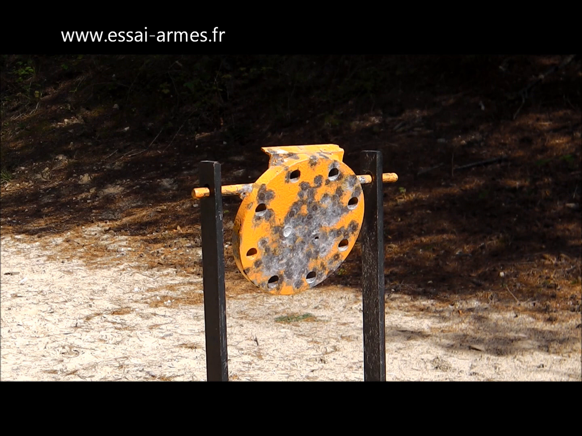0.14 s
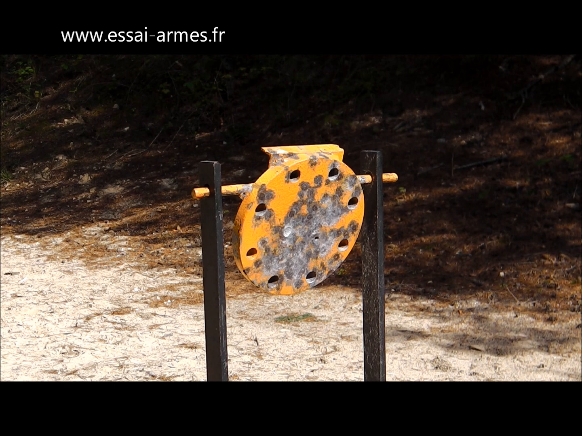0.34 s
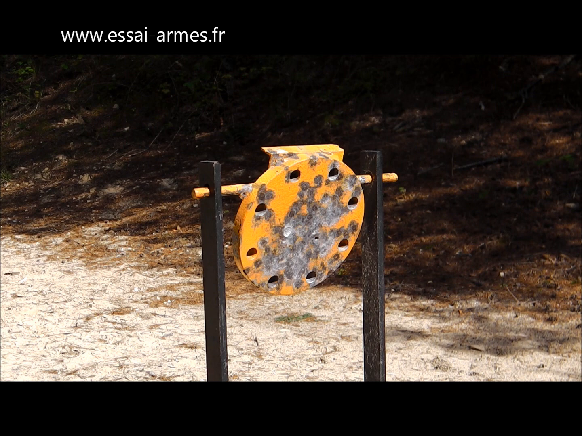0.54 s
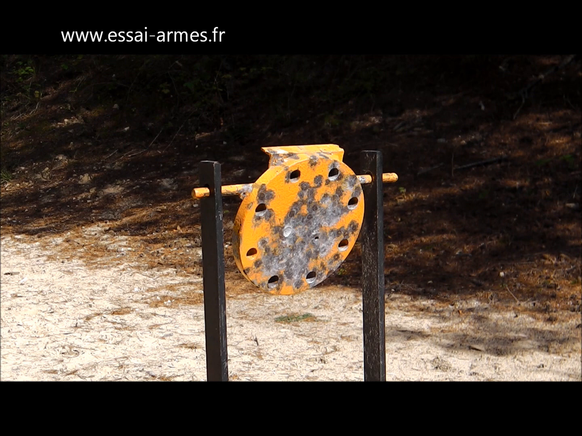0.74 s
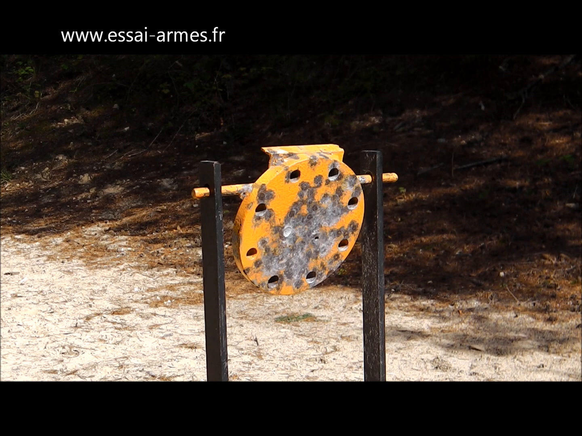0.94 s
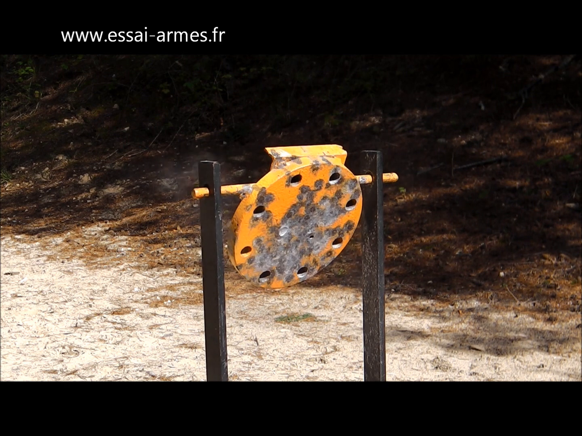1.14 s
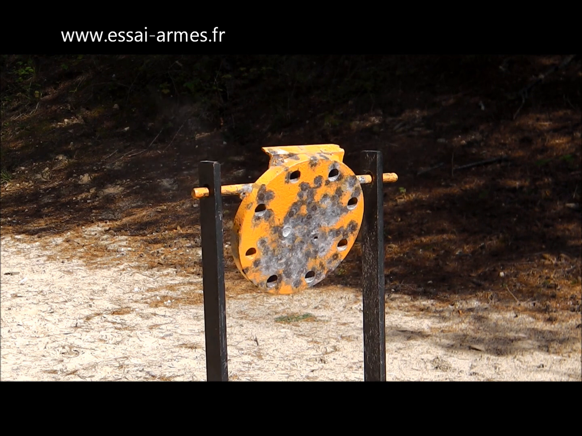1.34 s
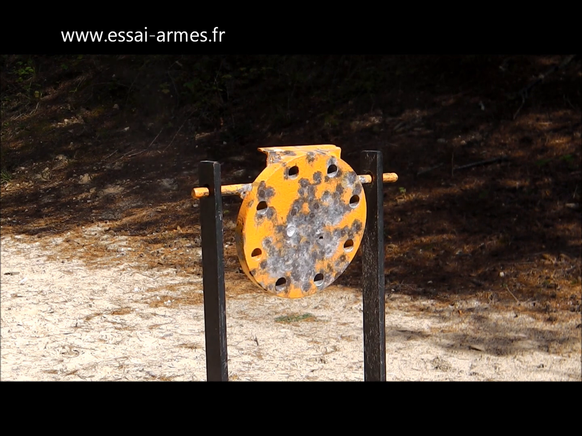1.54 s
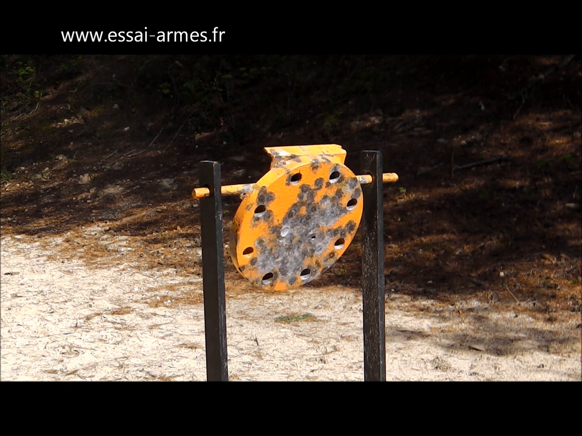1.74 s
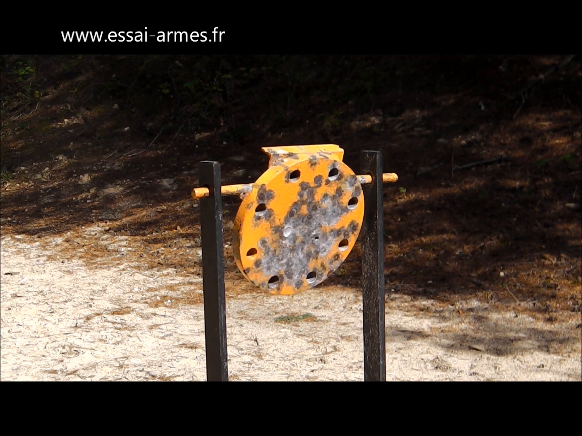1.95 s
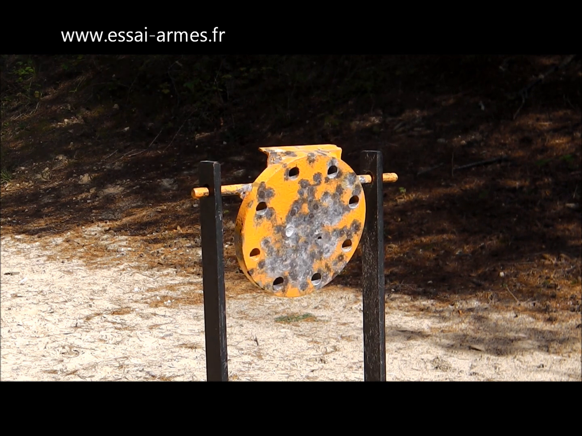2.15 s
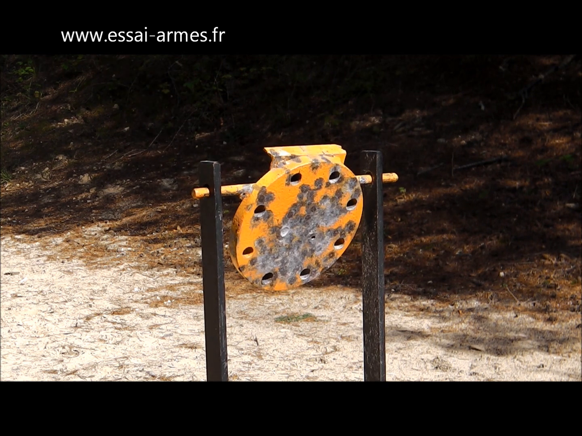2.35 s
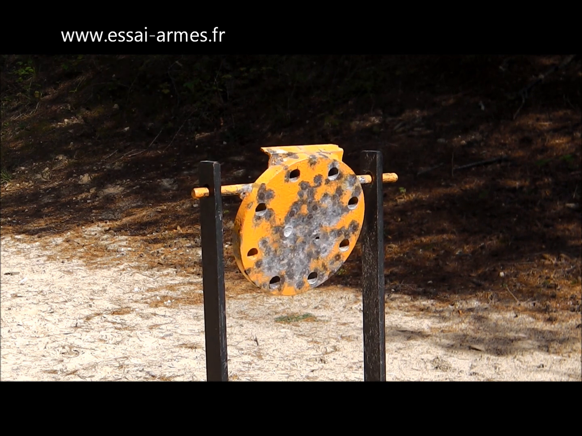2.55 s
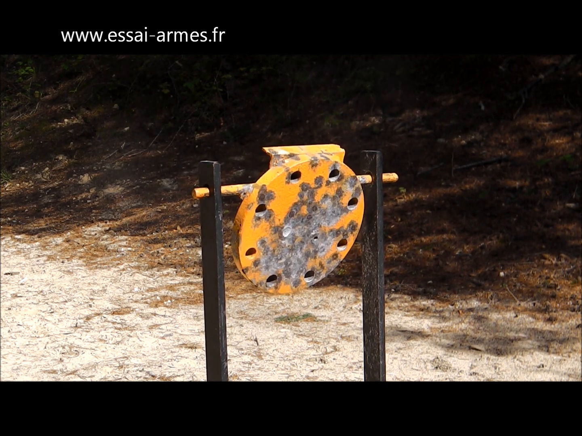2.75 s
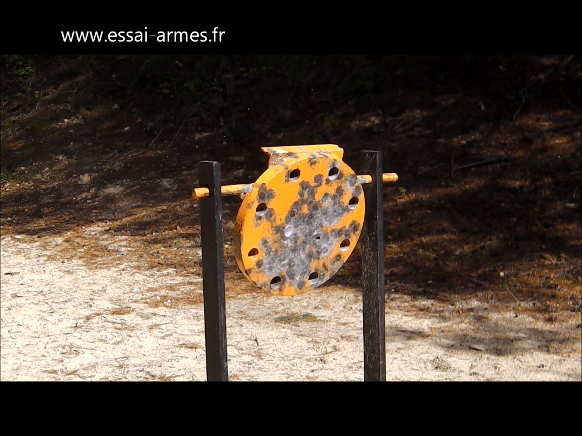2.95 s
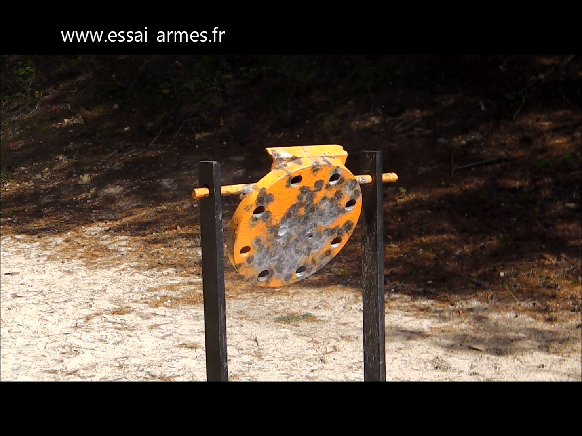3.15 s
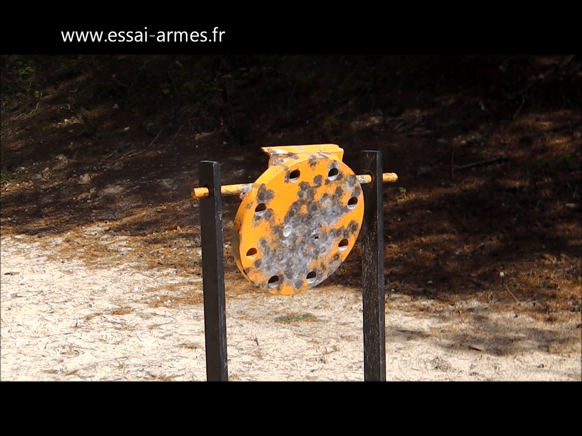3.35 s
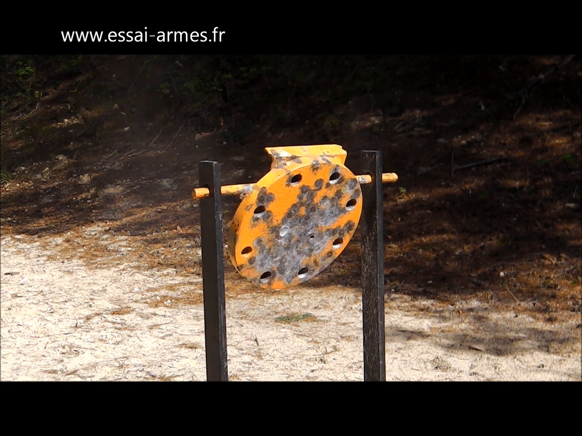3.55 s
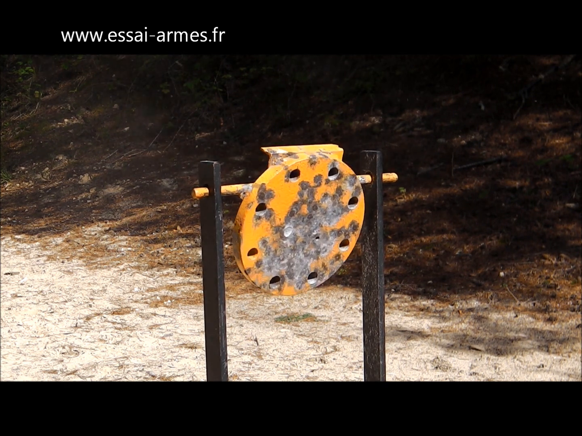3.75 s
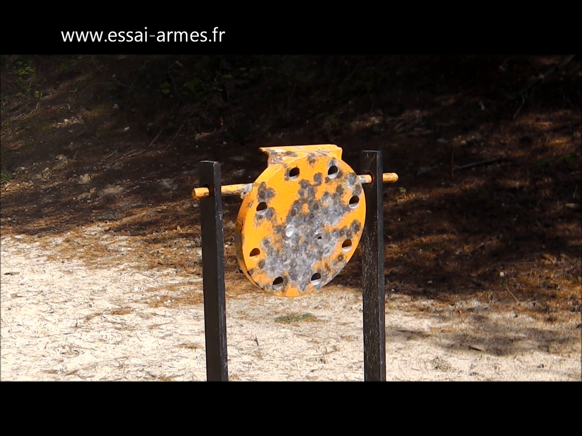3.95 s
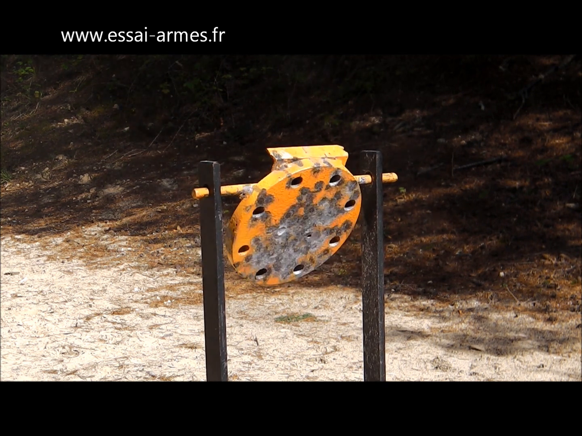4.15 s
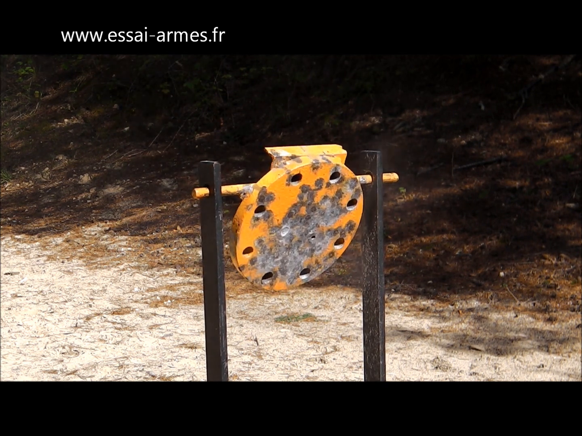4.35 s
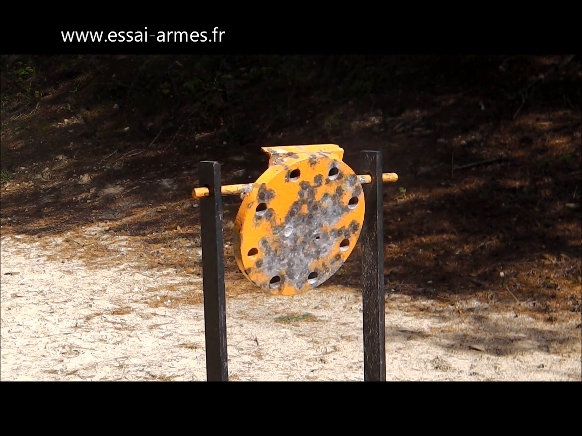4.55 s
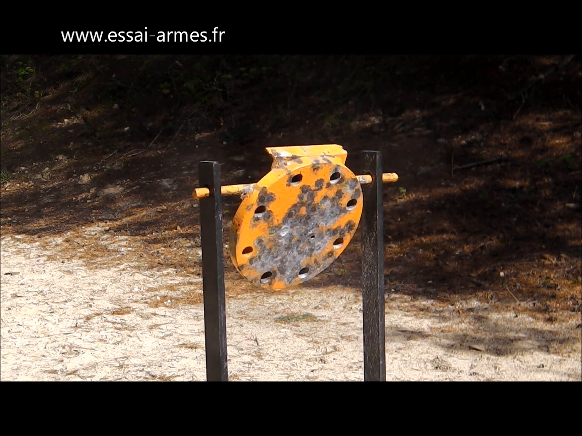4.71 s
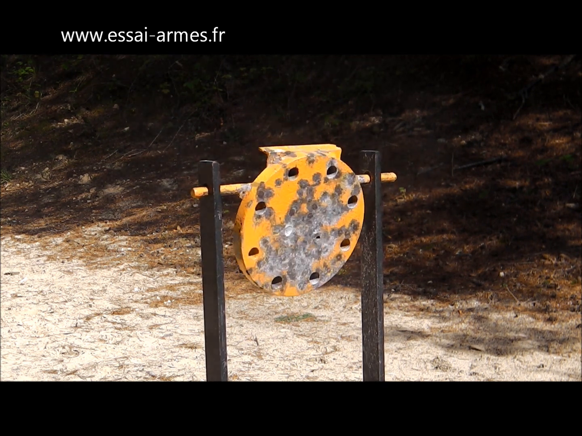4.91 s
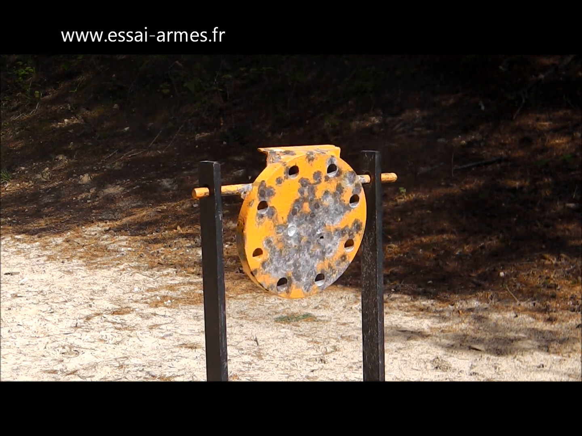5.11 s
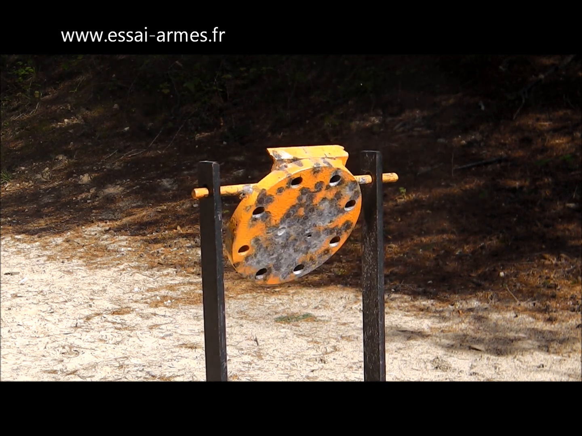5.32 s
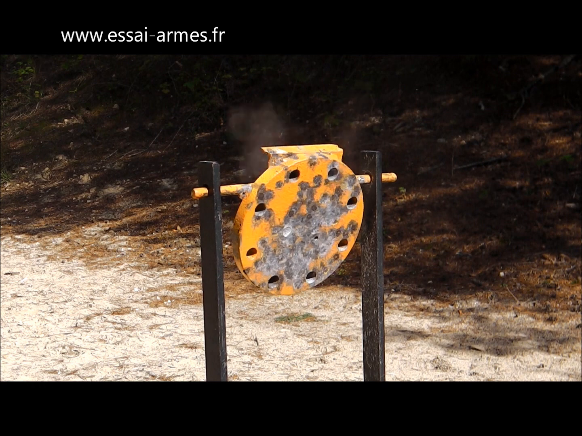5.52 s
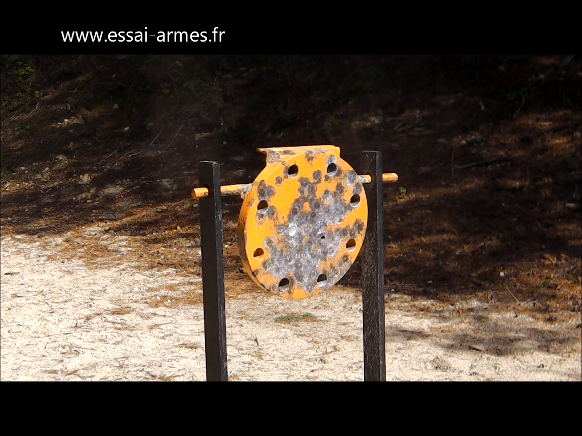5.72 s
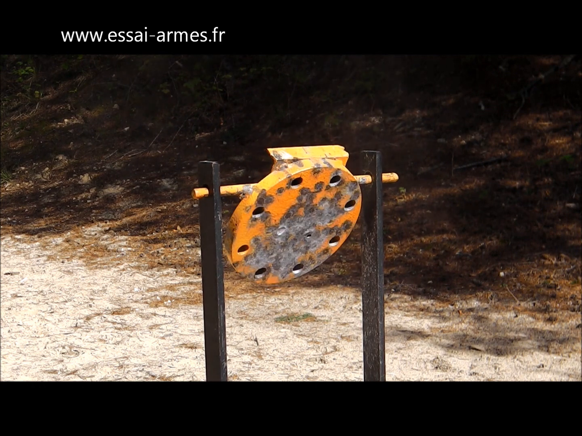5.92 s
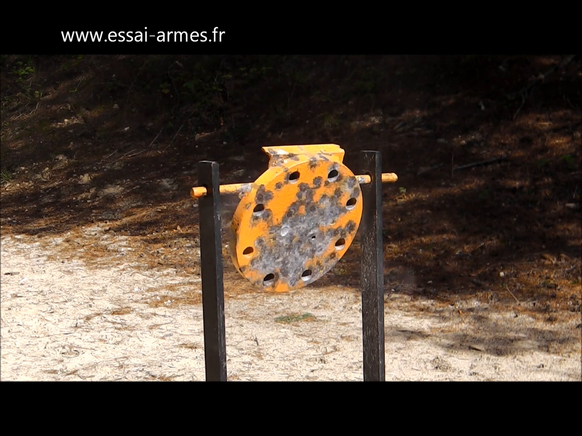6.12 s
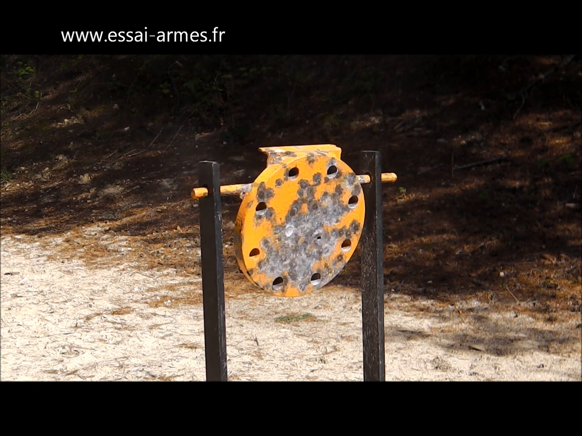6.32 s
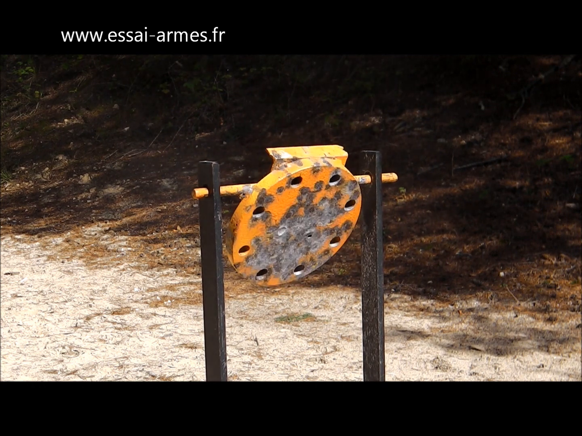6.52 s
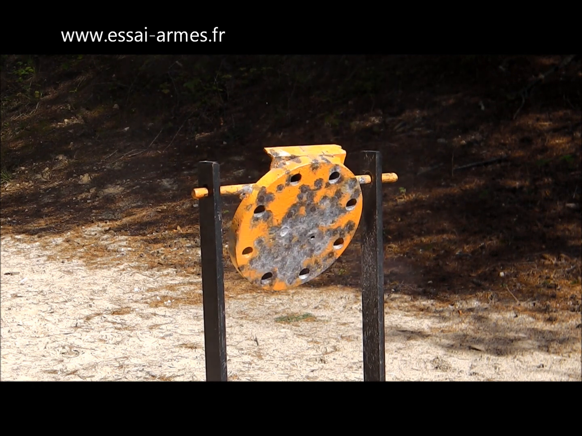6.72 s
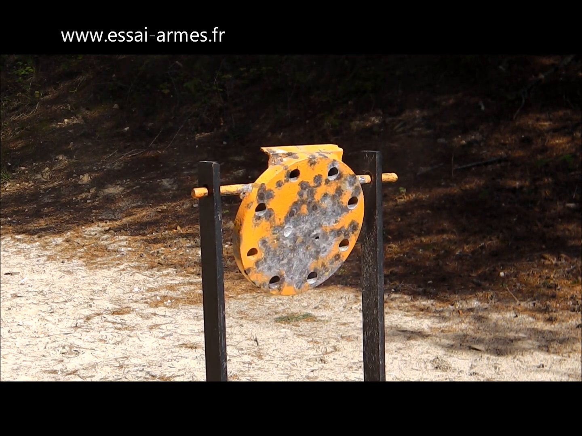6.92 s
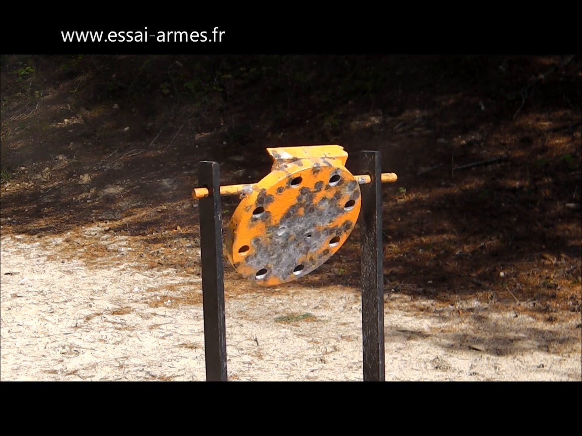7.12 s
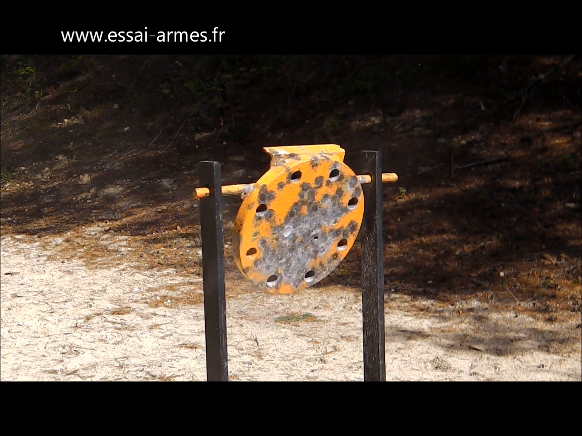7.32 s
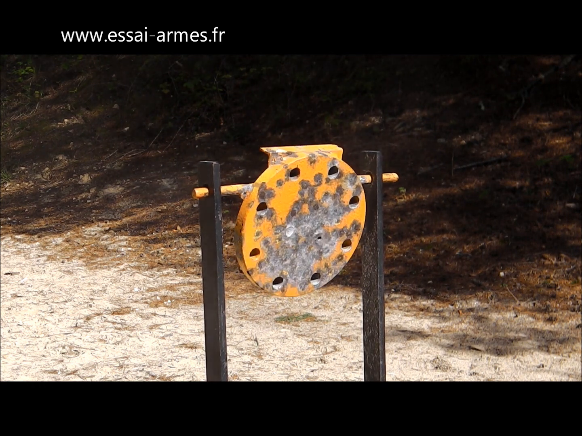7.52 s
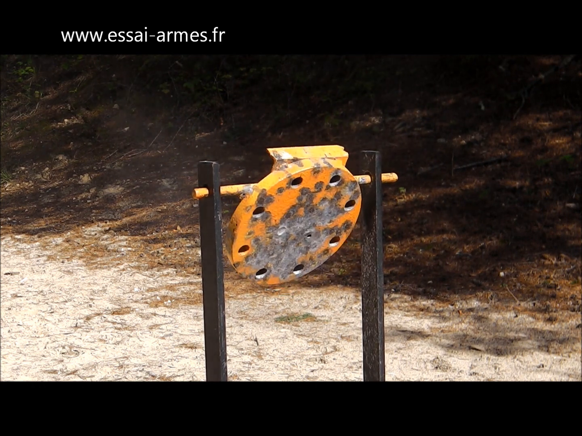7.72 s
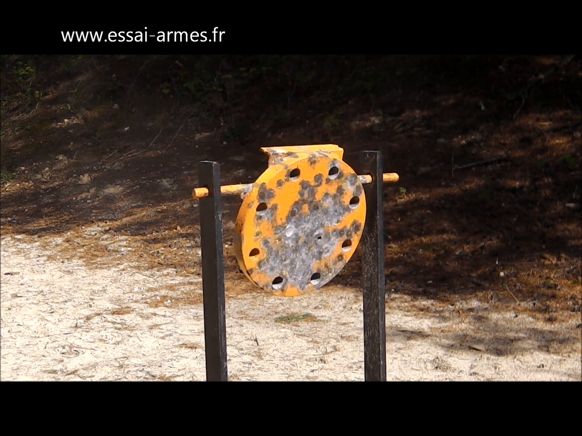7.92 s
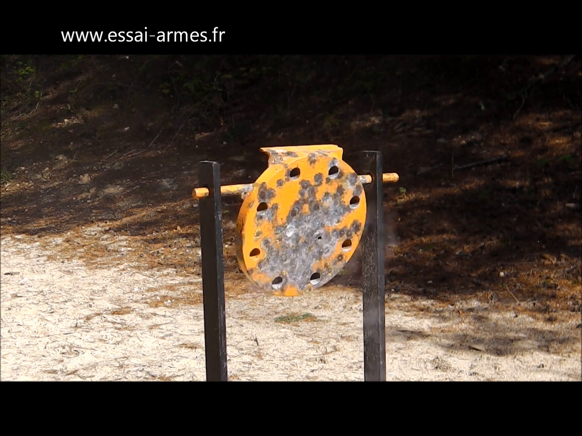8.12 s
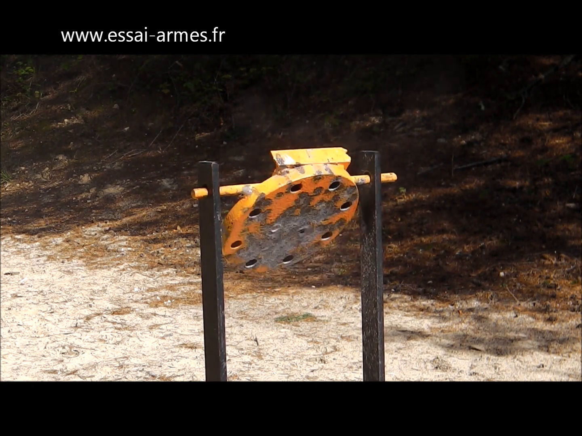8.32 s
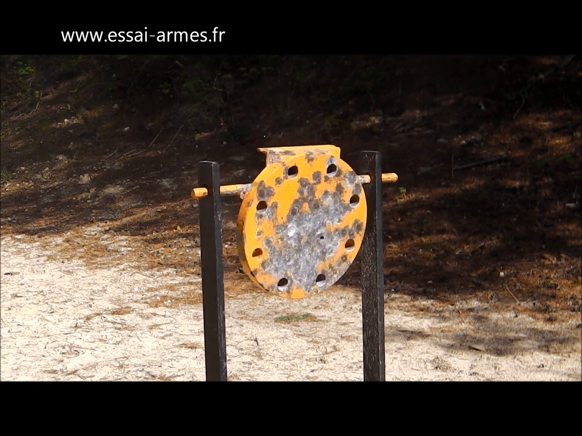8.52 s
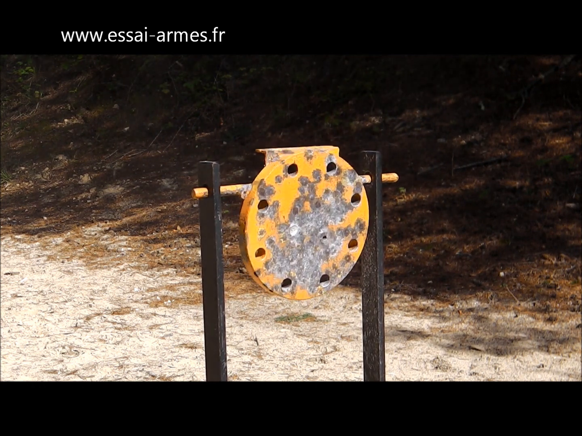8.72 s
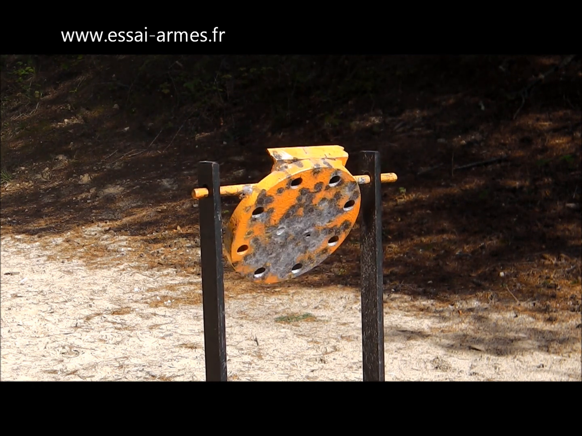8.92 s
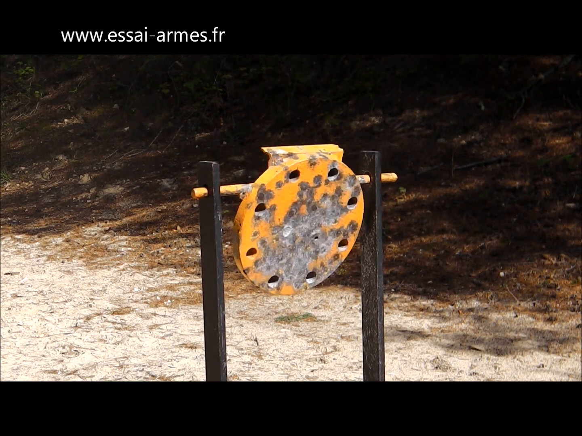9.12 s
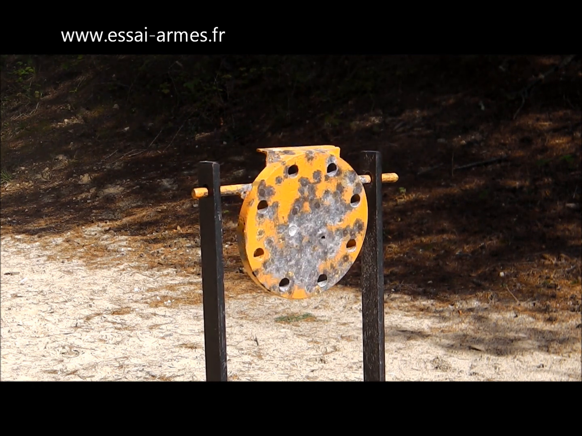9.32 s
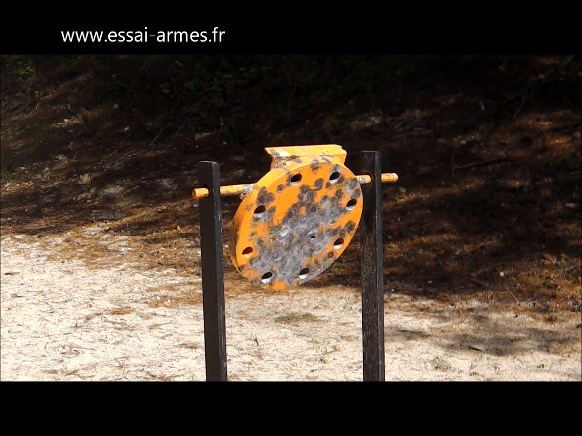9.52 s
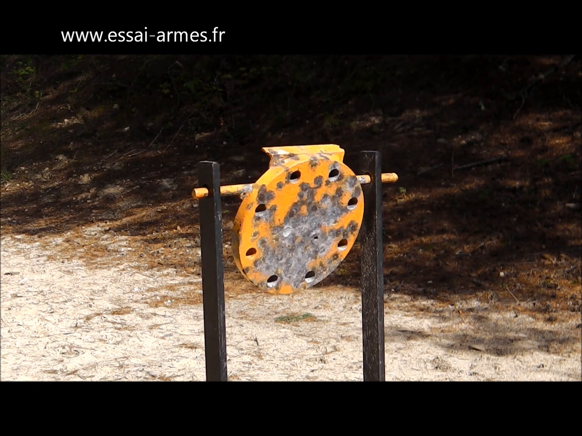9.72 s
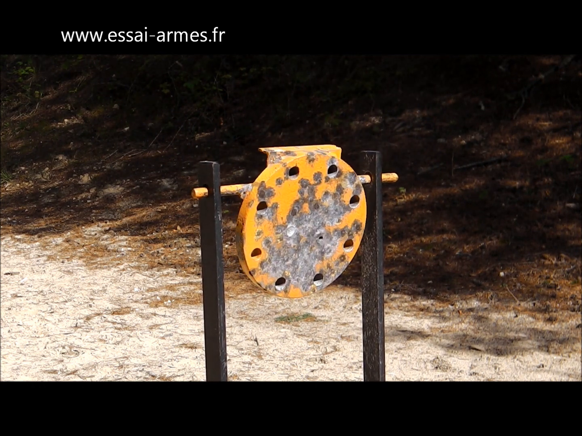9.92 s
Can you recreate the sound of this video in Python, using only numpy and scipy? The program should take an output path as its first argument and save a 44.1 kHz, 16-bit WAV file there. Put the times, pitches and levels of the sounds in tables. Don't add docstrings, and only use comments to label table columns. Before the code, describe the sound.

From 0 to 1.2 s there is only soft microphone hiss and a faint breeze in a quiet wood. At 1.2 s a small rifle starts firing, twenty-two shots until 8.3 s, spaced about 0.3 to 0.55 s apart. Each begins with a hard, dry, slightly overloaded crack and short low thump; about 9 ms later lead bursts on a hanging steel plate with a bright splat, fragments patter on the ground for a fraction of a second, and most hits add a short, high, quickly damped ping of varying strength. Scattered trunk echoes and a bank slap follow within 0.3 s, then a diffuse woodland wash rolls away. The camera's gain ducks and recovers around each shot. As the last tail fades, a bird gives a thin, very high whistle near 8.7 s and a louder one near 9.4 s, with a dry twig tick. Hiss and breeze remain until about 10 s.

```python
import sys
import numpy as np
from scipy import signal
from scipy.fft import rfft, irfft, next_fast_len
from scipy.io import wavfile
from scipy.ndimage import uniform_filter1d, map_coordinates

SR = 44100
rng = np.random.default_rng(int(sys.argv[2]) if len(sys.argv) > 2 else 0)


def amp(db):
    return 10 ** (np.asarray(db, float) / 20)


def wrap_up_sound(samples):
    columns = np.atleast_2d(samples).T
    tamed = np.clip(columns, -1, 1)
    steps = np.round(tamed * 32767).astype(np.int16)
    wavfile.write(sys.argv[1], SR, steps)


N = 439236

# start_s, boom_db, splash_db, spray_db, bank_echo_db
SHOTS = [(1.212, -23.5, -12.5, -28.9, -32), (1.6172, -30.5, -11, -21, -19.5), (1.969, -29.5, -13, -23, -23),
         (2.3977, -26, -12, -27, -27), (2.7351, -24, -10.5, -23, -25), (3.1756, -25, -11, -21, -30),
         (3.5559, -25.4, -8.5, -29.6, -24.5), (4.1181, -27, -9, -20.5, -28.5),
         (4.426, -24, -11.5, -26.5, -24.5), (4.7402, -24.5, -8, -28.5, -28), (5.031, -33, -5, -21.5, -32),
         (5.3459, -22, -9, -23.5, -30), (5.633, -24.5, -14.5, -27, -25.5),
         (5.9493, -23.1, -10, -22.5, -29.5), (6.2611, -22.5, -9.5, -21.5, -30),
         (6.5363, -23, -8.5, -24.5, -26), (6.8259, -26, -11, -24.5, -25.5), (7.1196, -29, -8, -22, -27.5),
         (7.4018, -25.5, -7.5, -59, -26.5), (7.6871, -30, -7.5, -21, -30),
         (7.9826, -24.5, -9.2, -25, -29.5), (8.279, -28.5, -8, -21.5, -40)]
# pitch_hz, level_db, t60_s, polarity
BOOM_MODES = [
    (73.3, 1, 0.061, 1),
    (394, 0, 0.055, -0.61),
    (130.6, 3.5, 0.11, 0.26),
]
# delay_s, level_db, colour_hz
TREES = [(.0065, -25, 2480), (.040, -14.5, 1150), (.045, -14, 1190), (.067, -13.5, 1520),
         (0.082, -42, 1630), (0.086, -14, 2310), (0.091, -23, 1590), (0.116, -33, 1700), (.130, -13, 1670),
         (.148, -18, 1490), (0.157, -24, 1460), (.162, -19.5, 1370), (0.17, -12.5, 2240), (.190, -27, 1700),
         (.197, -19, 1410), (0.201, -22, 1700), (.221, -17, 1300), (.241, -20, 1370), (.250, -32, 1390),
         (.268, -34, 1390)]
# freq_hz, density_db_per_hz
BANK_SPECTRUM = [(470, -19), (800, -34), (1780, 2.5), (3040, -1), (8360, -2.5), (11300, -10), (15800, -22)]
# freq_hz, density_db_per_hz
SPLASH_SPECTRUM = [(260, -43), (370, 3), (1290, -11.5), (3670, -2), (5200, -7), (8270, -2), (9140, -21),
                   (11200, 1), (15800, -19)]
# freq_hz, density_db_per_hz
SPRAY_SPECTRUM = [(180, -58), (300, -9), (510, -6), (735, -10), (1430, -5), (3320, -2), (3550, -11.5),
                  (3920, -3.5), (11200, -2.5), (15800, -14)]
# freq_hz, likeness
SPRAY_ALIKE = [(60, 0.48), (240, -0.2), (950, 0.51), (3770, 0.47), (15000, -0.17)]
# pitch_hz, t60_s, blur_hz, share_free_of_hanger (0-1)
PLATE_MODES = [(2128, .4, 3, .1), (3594, .3, 6, 0), (4110, .6, 6, .4), (4640, .7, 16, .2),
               (8330, .2, 30, 0), (11040, .2, 20, 0), (11600, .24, 10, 0), (12071, .22, 10, 0),
               (13487, .17, 12, 0)]
# nodal_diameters, half_waves_centre_to_rim, turn_deg, level_db
MODE_SHAPES = [(2, 1.6, 70, 0), (0, .4, 0, -9.5), (1, 2.1, 140, -21), (3, .4, 0, -3), (2, .3, 45, -8),
               (1, 1.4, 20, -12), (1, 1.7, 150, -12), (2, .6, 75, -5), (1, .6, 50, -12)]
# start_s, radius (0-1), angle_deg, blow_db
HITS = [(1.2121, 1.0, 260, -24.4), (2.7347, 0.55, 75, -15.1), (3.176, 0.4, 130, -13.1),
        (3.5558, 0.9, 160, -19.0), (4.118, 0.6, 205, -12.7), (4.4265, 0.7, 135, -11.3),
        (4.74, 1.0, 260, -23.9), (5.0305, 0.8, 155, -11.1), (5.3461, 0.65, 20, -15.8),
        (5.9496, 0.35, 35, -7.7), (6.2602, 0.4, 155, -13.2), (6.5364, 0.35, 305, -13.5),
        (6.8253, 0.55, 125, -18.2), (7.1188, 1.0, 250, -18.8), (7.687, 0.95, 155, -15.6),
        (7.9826, 1.0, 260, -23.7), (8.2785, 0.9, 260, -10.3)]
# freq_hz, density_db_per_hz
WOOD_SPECTRUM = [(18, -56), (30, -18), (88, -14.5), (251, -21), (471, -13), (551, -14), (1890, -3),
                 (3280, -5), (7390, 5), (9110, -2), (11200, 8.5), (14200, -6), (15800, -64)]
# freq_hz, t60_s
WOOD_T60 = [(100, 11), (700, 12.1), (1800, 3.92), (4800, 1.31), (12800, 0.55)]
# freq_hz, likeness
WOOD_ALIKE = [(60, 1), (180, 0.94), (550, 1), (1650, 0.94), (4970, 0.37), (15000, -0.55)]
# delay_s, spread_s, swell_db
SLOPES = [
    (0.391, 0.055, 3.5),
    (.6, 0.17, 1.5),
    (.72, 0.12, 2.5),
]
# time_s, pitch_hz, level_db
WHISTLES = [
    [(8.62, 8140, -59), (8.636, 8460, -52), (8.69, 8350, -15), (8.704, 8300, -12), (8.728, 8240, -26),
     (8.738, 8340, -19), (9.006, 8340, -52), (9.03, 8270, -61.5)],
    [(9.28, 8351, -71), (9.31, 8360, -42), (9.378, 8360, -8.5), (9.392, 8380, -7.5), (9.434, 8330, -20.5),
     (9.478, 8320, -19.5), (9.53, 8350, -42), (9.556, 8360, -36), (9.72, 8200, -72)],
]
# time_s, pitch_hz, level_db
CLOSES = [
    [(8.85, 5178, -63), (8.858, 5392, -74), (8.868, 5140, -59), (8.9, 5283, -53), (8.93, 5180, -64)],
    [(9.465, 6483, -76), (9.491, 5270, -40.5), (9.497, 5210, -48), (9.551, 5298, -39.5), (9.575, 5270, -64),
     (9.64, 5261, -68)],
]
# time_from_peak_s, pitch_hz, level_under_peak_db
LEAD_SHAPE = [
    (-.022, 8940, -30),
    (-.012, 8930, -6),
    (0, 8960, 0),
    (.016, 8955, -30),
]
# peak_s, peak_db
LEADS = [
    (8.661, -35),
    (9.32, -32),
    (1.594, -35),
]
# start_s, peak_db
TWIGS = [
    (9.3685, -5.5),
]
# freq_hz, density_db_per_hz
HISS_SPECTRUM = [(24, -52), (40, -13), (143, -7.5), (275, -19), (327, -10.5), (380, -3.5), (500, -5),
                 (611, -9.5), (1430, -12.5), (3890, -13), (7280, -14), (9820, -16.5), (11400, -14.5),
                 (15800, -22)]
# peak_s, peak_db
GUSTS = [(0.0, -67), (1.4, -49), (3.3, -54), (4.58, -50), (6.3, -59), (7.3, -52), (7.93, -56), (9.05, -61),
         (9.4, -60.5), (9.8, -59.5)]
# freq_hz, floor_db
MASK = [(45, -30), (130, -42), (300, -52), (3000, -81.5), (7000, -68.5), (9000, -59), (11000, -58),
        (13000, -48), (14500, -42.5), (15500, -37.5)]
# freq_hz, likeness
HISS_ALIKE = [(300, -0.19), (15000, -0.52)]
# freq_hz, density_db_per_hz
BREEZE_SPECTRUM = [(20, 2.0), (70, -13), (130, -17.5), (250, -33.5)]
# freq_hz, likeness
BREEZE_ALIKE = [(50, 0.92)]

CRACK_DB, DEEP_OVER_BOOM_DB, THUMP_OVER_BOOM_DB = 1, -0.4, 1
FLIGHT_MS, RING_S = 8.8, 0.095
WOOD_DB, WOOD_DB_PER_SPRAY_DB, WOOD_LOSS_PER_BOOM_DB = -29, 0.76, 0.052
LEAST_SPRAY_DB, WOOD_SPAN_S = -25.5, 1.5
CALM_DB, GUST_S = -74, 0.25


def unit(x):
    return x / np.sqrt(np.mean(x ** 2) + 1e-20)


def along(points, hz):
    f, v = np.transpose(points)
    return np.interp(np.log(hz + 1), np.log(f + 1), v)


def filtered(x, response):
    m = next_fast_len(x.shape[-1] + 4096)
    spectrum = rfft(x, m) * response(np.fft.rfftfreq(m, 1 / SR))
    return irfft(spectrum, m)[..., :x.shape[-1]]


def rush(size, spectrum, alike):
    def colour(hz):
        turn = np.arccos(np.clip(along(alike, hz), -1, 1)) / 2
        return amp(along(spectrum, hz)) * [np.cos(turn), np.sin(turn)]

    mid, side = filtered(rng.standard_normal((2, size)), colour)
    return unit(np.array([mid + side, mid - side]))


def wobble(size, rate_hz):
    knots = rng.standard_normal(size // 16)
    return map_coordinates(knots, [np.arange(size) * rate_hz / SR], mode="mirror")


def add(mix, sound, start_s):
    mix[:, round(start_s * SR):][:, :sound.shape[-1]] += sound


def crack(t, hz, t60_s):
    return (t > 0) * np.sin(2 * np.pi * hz * t) * amp(-60 * np.abs(t) / t60_s)


def trunks(t, spray_db, sides):
    echoes = np.zeros((2, len(t)))
    around = t[:SR // 50] - 1 / 200
    for delay_s, db, hz in TREES:
        since = around - rng.normal(0, 0.00022)
        pan_db = rng.normal(0, 0.96) * sides
        crown = 0.16 * amp(-60 * np.abs(since) / 0.0064) * rng.standard_normal((2, len(since)))
        trunk = crack(since, hz * amp(rng.normal(0, 1.0)), 0.0045)
        if delay_s < 0.075:
            db += 0.87 * (spray_db + 23.5)
        level = amp(db + rng.normal(0, 1.2) + pan_db)
        add(echoes, level * (trunk + crown), delay_s - 1 / 200)
    return filtered(echoes, lambda hz: 1 / (1 + (330 / (hz + 1)) ** 6))


def rifle(t, crack_db, spray_db, bank_db, deep_db, thump_db):
    sides = np.array([[1], [-1]])
    shot = 1.4 * crack(t - 0.00002 * sides, 2500 * amp(rng.normal(0, 0.3)), 0.003)
    shot -= crack(t - 0.0013 - rng.normal(0, 0.0001), 1500, 0.003)
    shot += amp(-5.0 - 60 * t / 0.0057) * rng.standard_normal((2, len(t)))
    shot *= amp(crack_db)
    blows_db = [deep_db + 14.0, thump_db + 12.5, deep_db + 7.0]
    for (hz, db, t60_s, sign), blow_db in zip(BOOM_MODES, blows_db):
        since = t - 0.00011 * sides * rng.normal() - 0.081 / hz
        level = sign * amp(db + blow_db + 0.5 * sides)
        shot += level * crack(since, hz * amp(0.2 * rng.normal()), t60_s)
    bank_level = amp(bank_db + 8 - 60 * np.abs(t - 0.147) / 0.025)
    bank = bank_level * rush(len(t), BANK_SPECTRUM, SPRAY_ALIKE)
    return shot + trunks(t, spray_db, sides) + bank


def struck(start_s):
    spokes, waves, turn_deg, mode_db = np.transpose(MODE_SHAPES)
    for hit_s, radius, angle_deg, blow_db in HITS:
        if abs(hit_s - start_s) < 1 / 20:
            swing = radius ** spokes * np.cos(np.pi * waves * radius)
            swing = swing * np.cos(np.radians(spokes * (angle_deg - turn_deg)))
            return blow_db + mode_db + 20 * np.log10(np.abs(swing) + 1e-3)
    return mode_db - 60


def plate(t, splash_db, spray_db, ring_db, flight_ms, length_s):
    since = np.maximum(t - flight_ms / 1000, 0)
    landed = since > 0
    patter = unit(amp(2.4 * wobble(len(t), 1400)))
    first = amp(-9 + 0.61 * (spray_db + 24.0)) * (t > 0.002) * (since == 0)
    burst = first + landed * (np.exp(-(since / 0.0049) ** 2) + 0.14 * np.exp(-since / 0.014))
    splash = amp(splash_db + 4.0) * burst * patter * rush(len(t), SPLASH_SPECTRUM, SPRAY_ALIKE)
    spray_level = amp(spray_db + 10 - 60 * since / 0.24) * landed
    spray = spray_level * patter * rush(len(t), SPRAY_SPECTRUM, SPRAY_ALIKE)
    swell = 1 - np.exp(-since / 0.011)
    gripped = np.exp(-(since / length_s) ** 3)
    ring = np.zeros((2, len(t)))
    for (hz, t60_s, blur_hz, free), db in zip(PLATE_MODES, ring_db):
        sway_hz = hz + blur_hz * wobble(len(t), 44.7)
        phase = 2 * np.pi * (np.cumsum(sway_hz) / SR + rng.random()) + rng.normal(0, 0.17, (2, 1))
        level = amp(db + 10.5 - 60 * since / t60_s + wobble(len(t), 32))
        damping = free + (1 - free) * gripped ** (1 + 15 * free)
        ring += level * damping * np.sin(phase)
    return splash + spray + swell * ring


def wood(wood_db):
    size = round(WOOD_SPAN_S * SR)
    hz, t, z = signal.stft(rush(size, WOOD_SPECTRUM, WOOD_ALIKE), SR, nperseg=256)
    hz = hz[:, None]
    roll_db = sum(db * np.exp(-((t - delay_s) / spread_s) ** 2) for delay_s, spread_s, db in SLOPES)
    shape_db = -60 * t / along(WOOD_T60, hz) + roll_db / (1 + (hz / 3000) ** 2) - 9 * t ** 3
    clumps = uniform_filter1d(rng.standard_normal(z.shape[1:]), 8, 0)
    clumps = uniform_filter1d(clumps, 6, 1)
    z = z * amp(shape_db + 1.37 * unit(clumps))
    tail = signal.istft(z, SR, nperseg=256)[1][:, :size]
    onset = 1 - np.exp(-(np.arange(size) / SR / 0.049) ** 2)
    return amp(wood_db + 8.5) * onset * tail


def note(rows, smear, pan_db, rate_hz=70):
    s, hz, db = np.transpose(rows)
    t = np.arange(round(s[0] * SR), round(s[-1] * SR)) / SR
    beats = wobble(len(t), rate_hz) + 1j * wobble(len(t), rate_hz)
    beats = beats + 0.15 * np.array([wobble(len(t), rate_hz) for _ in range(2)])
    echo = smear * np.clip((t - s[np.argmax(db)]) / 0.0193, 0.15, 1)
    tone = np.exp(2j * np.pi * np.cumsum(np.interp(t, s, hz)) / SR)
    tone = tone * (1 + echo * beats) / np.sqrt(0.5 + echo ** 2)
    level = amp(np.interp(t, s, db) + np.array([[0.5], [-0.5]]) * pan_db)
    return tone.real * level * signal.windows.tukey(len(t), 0.06)


def bird():
    mix = np.zeros((2, N))
    for whistle, close in zip(WHISTLES, CLOSES):
        add(mix, note(whistle, smear=0.3, pan_db=1.6), whistle[0][0])
        add(mix, note(close, smear=0.23, pan_db=-4), close[0][0])
    for peak_s, db in LEADS:
        lead = np.add(LEAD_SHAPE, [peak_s, 0, db])
        add(mix, note(lead, smear=0.15, pan_db=8), peak_s + LEAD_SHAPE[0][0])
    for start_s, db in TWIGS:
        add(mix, amp(db - 3.5) * crack(np.arange(200) / SR, 8300, 0.0022), start_s)
    return mix


def floor():
    t = np.arange(N) / SR
    gusts_db = sum((db - CALM_DB) * np.exp(-((t - peak_s) / GUST_S) ** 2) for peak_s, db in GUSTS)
    breeze = rush(N, BREEZE_SPECTRUM, BREEZE_ALIKE)
    breeze *= amp(CALM_DB + gusts_db + 9 + 2.2 * wobble(N, 13.0))
    return amp(-49.0) * rush(N, HISS_SPECTRUM, HISS_ALIKE) + breeze


def duck(depth_db, release_s, call_share):
    peaks = [max(call, key=lambda row: row[2])[0] for call in WHISTLES]
    t = np.arange(N) / SR
    starts = np.array([0] + [row[0] for row in SHOTS] + peaks)
    last = np.searchsorted(starts, t, side="right") - 1
    share = np.where(last > len(SHOTS), call_share, last > 0)
    return amp(-depth_db * share * np.exp(-(t - starts[last]) / release_s))


def scene():
    near, far = np.zeros((2, 2, N + 2 * SR))
    t = np.arange(SR // 3) / SR
    for start_s, boom_db, splash_db, spray_db, bank_db in SHOTS:
        deep_db, thump_db = boom_db + DEEP_OVER_BOOM_DB, boom_db + THUMP_OVER_BOOM_DB
        wood_db = WOOD_DB + WOOD_DB_PER_SPRAY_DB * (max(spray_db, LEAST_SPRAY_DB) + 25.5)
        wood_db -= WOOD_LOSS_PER_BOOM_DB * (boom_db + 21)
        add(near, rifle(t, CRACK_DB, spray_db, bank_db, deep_db, thump_db), start_s)
        add(near, plate(t, splash_db, spray_db, struck(start_s), FLIGHT_MS, RING_S), start_s)
        add(far, wood(wood_db), start_s)
    shots = near[:, :N] + far[:, :N] * duck(depth_db=7, release_s=0.066, call_share=0.1988)

    def capsule(hz):
        peak = 0.64 / (1 + ((hz - 8330) / 220) ** 2)
        dip = 0.45 / (1 + ((hz - 250) / 55) ** 4)
        return 1 + peak - dip

    ducked_floor = floor() * duck(depth_db=7.5, release_s=0.15, call_share=0.46)
    return filtered(shots, capsule) + bird() + ducked_floor


def blocks(x, grit_db):
    hz, _, z = signal.stft(x, SR, nperseg=1024)
    band = np.abs(uniform_filter1d(np.mean(np.abs(z) ** 2, 0), 9, 0))
    z = z + amp(grit_db) * np.sqrt(band) * np.exp(2j * np.pi * rng.random(z.shape))
    kept = band > amp(2 * along(MASK, hz))[:, None] * band[hz < 6000].sum(0)
    tilted = band * amp(2 * 5.3 * hz[:, None] / 1000)
    kept &= tilted > amp(2 * -27) * np.maximum.accumulate(tilted * (hz[:, None] > 6000), 0)
    return signal.istft(z * kept, SR, nperseg=1024)[1][:, :N]


def band_limit(x):
    return signal.sosfilt(signal.butter(12, 16440, fs=SR, output="sos"), x)


def record(dry):
    x = dry / (1 + np.abs(dry / 1.02) ** 4) ** (1 / 4)

    def response(hz):
        notch = 1 - 1 / (1 + ((hz - 7875) / 85) ** 2)
        treble_cut = 1 / (1 + (hz / 15800) ** 120)
        wind_cut = 1 / (1 + (45 / (hz + 1)) ** 2)
        return notch * treble_cut * wind_cut

    x = blocks(filtered(x, response), grit_db=-7.5)
    mix = np.clip(x, -1, 1)
    return band_limit(mix)


dry = scene()
out = record(dry)
wrap_up_sound(out)
```